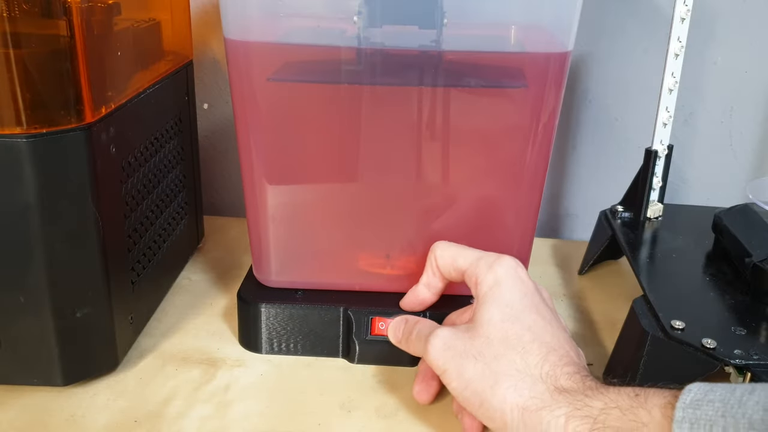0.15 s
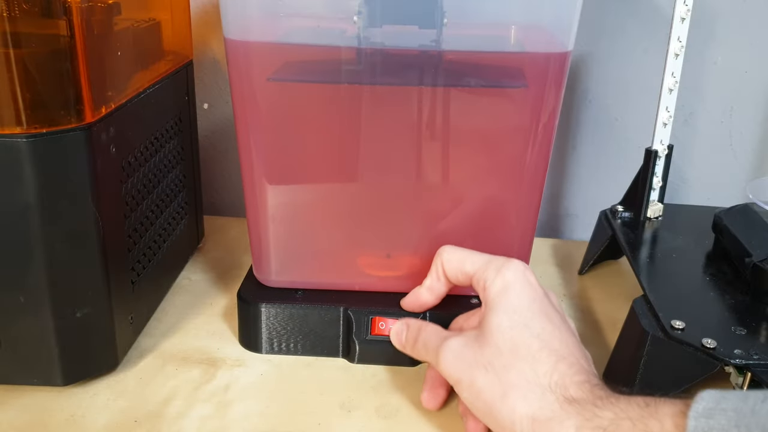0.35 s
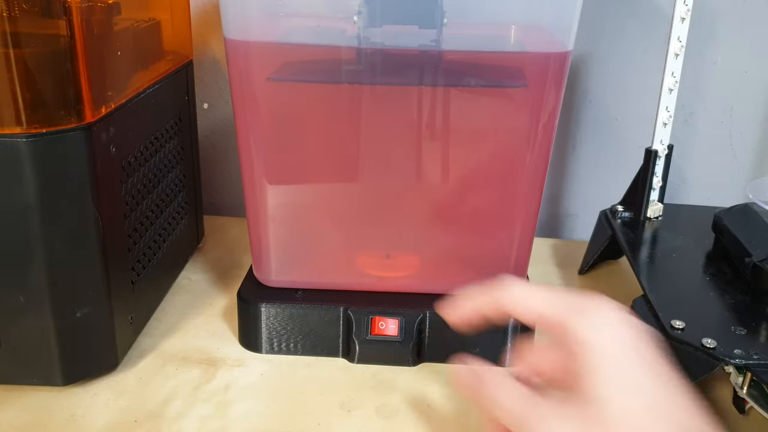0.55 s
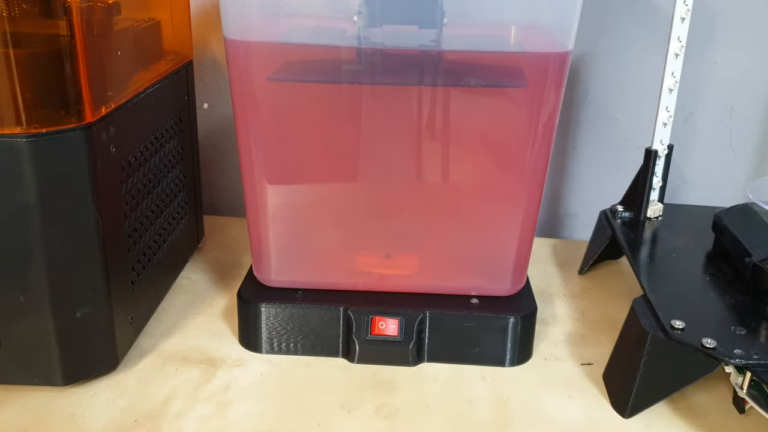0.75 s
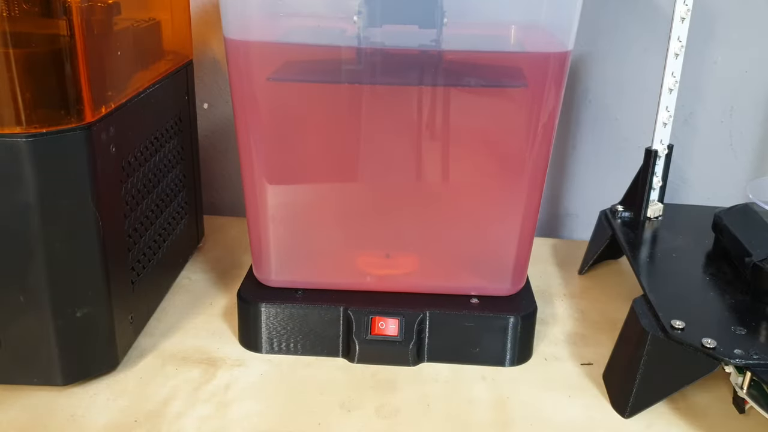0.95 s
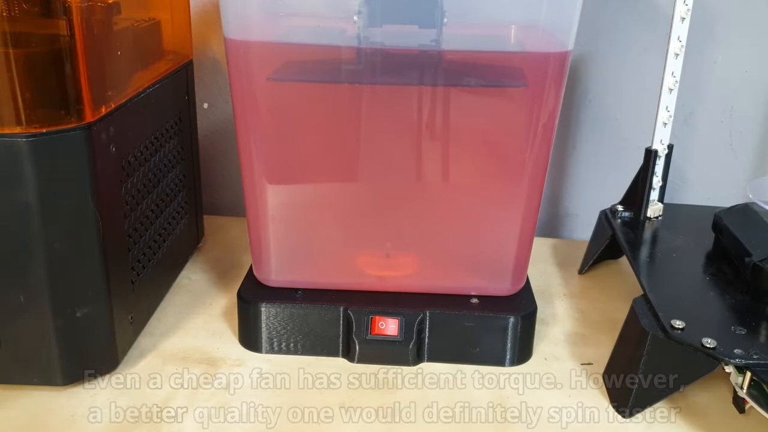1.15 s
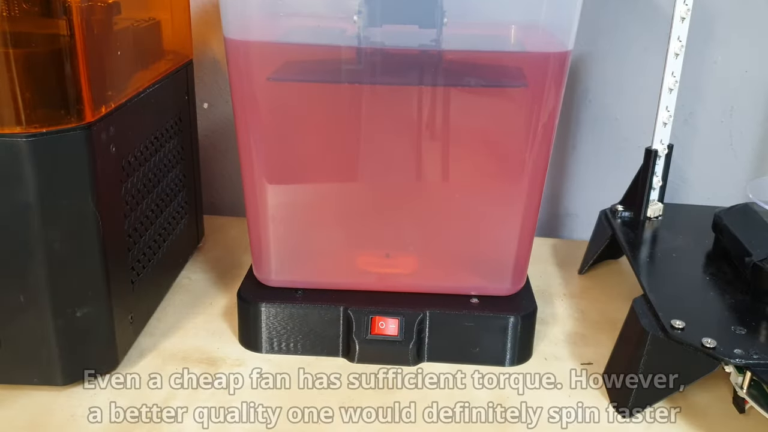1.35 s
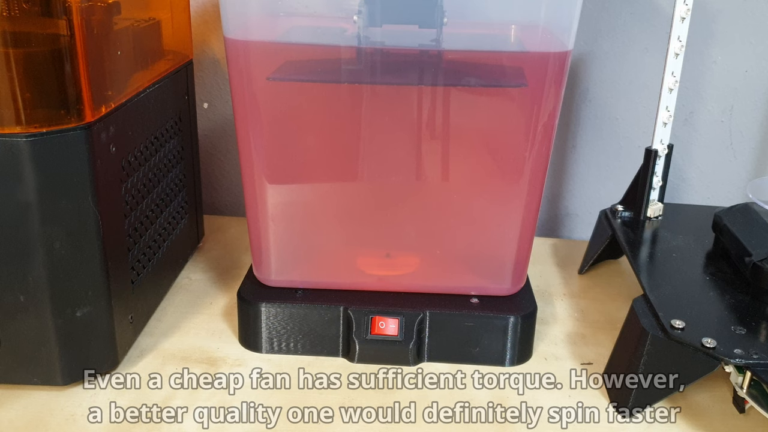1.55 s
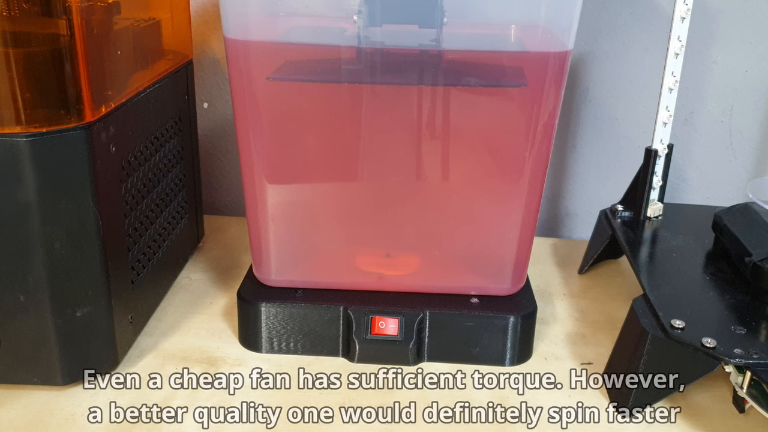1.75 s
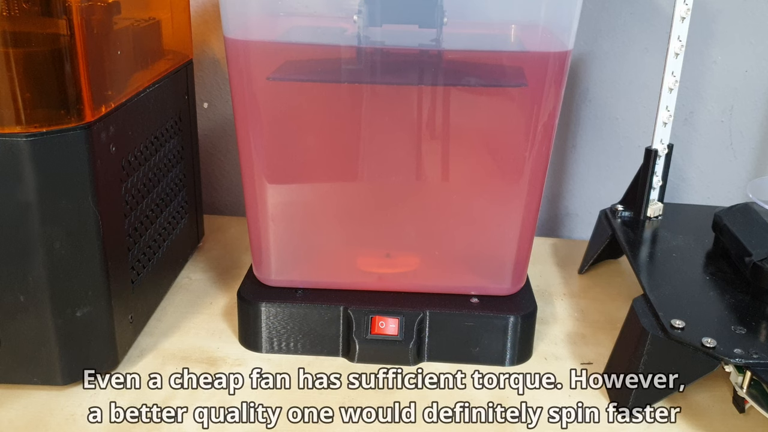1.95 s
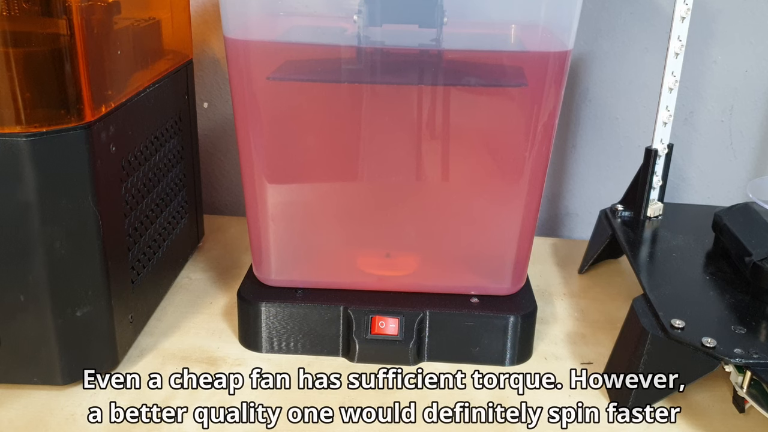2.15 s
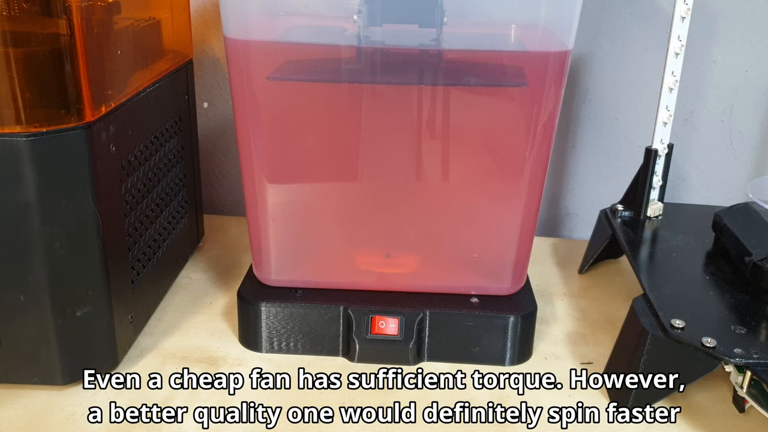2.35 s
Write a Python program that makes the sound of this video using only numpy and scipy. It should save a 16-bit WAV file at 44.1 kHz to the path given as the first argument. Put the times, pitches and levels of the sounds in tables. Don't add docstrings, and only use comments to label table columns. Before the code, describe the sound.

A plastic rocker switch snaps on at about 0.2 s: a sharp, bright, hollow crack with a quick rebound rattle, bench thump and short room tail. Before it, only faint room air. From about 0.3 s a stirrer spins up, reaching a steady muffled rumble by 0.8 s, rubbing and knocking unevenly about seven turns a second until 2.4 s. A sleeve rustles faintly near 0.5 s; low hum and hiss lie underneath.

```python
import sys
import numpy as np
from scipy import signal
from scipy.fft import rfft, irfft, next_fast_len
from scipy.io import wavfile
from scipy.ndimage import map_coordinates

SR = 44100
rng = np.random.default_rng(int(sys.argv[2]) if len(sys.argv) > 2 else 0)


def amplitude_ratio(level_db):
    exponent = np.asarray(level_db, float) / 20
    return 10 ** exponent


def master(y):
    cut = np.clip(np.atleast_2d(y).T, -1, 1)
    pcm = np.round(cut * 32767)
    wavfile.write(sys.argv[1], SR, pcm.astype(np.int16))


N = 105840

# hz, level_db_per_hz
AIR_SPECTRUM = [(18, -30), (30, -1.5), (93, -4.5), (188, -25.5), (285, -9.5), (714, -28.5), (1980, -16.5),
                (7350, -34.5), (15700, -25)]
# time_s, level_db
AIR_LEVEL = [(0, -71), (.2, -78), (.7, -76), (1.4, -79), (2.4, -78.5)]
# hz, level_db_per_hz
HISS_SPECTRUM = [(1470, -31), (2500, -4), (3050, -13.5), (4810, -2.5), (5230, -2.5), (6900, 0.5),
                 (8170, -9), (12100, 0.5), (15700, -7.5)]
# time_s, level_db
SLEEVE_LEVEL = [(.21, -95.5), (.4, -74), (.53, -63), (.58, -71.5), (.65, -73), (.75, -75), (.9, -81),
                (1.0, -75), (1.15, -80), (1.35, -88), (1.6, -105)]
# hz, level_db_per_hz
CLOTH_SPECTRUM = [(2500, -23), (5000, -11), (6600, 0.5), (7600, -6), (8400, -16), (11000, -6),
                  (15700, -6.5)]
# centre_s, half_length_s, centre_hz, width_hz, level_db
THIN_HISS = (-2, 3.62, 14001.5, 1501, -83.5)
# time_s, level_db
HUM_LEVEL = [(0, -82), (.6, -99), (.95, -91), (1.7, -82.5), (2.4, -87.5)]
# hz, t60_s
ROOM_T60 = [(150, .3), (500, .35), (1200, .42), (2300, .44), (3200, .52), (6000, .44), (9000, .33),
            (15000, .29)]
# hz, gain_db
ROOM_COLOUR = [(150, 1), (600, -0.5), (1500, 0), (3200, 2), (4500, -1.5), (8500, 1.5), (11000, -1.5),
               (15000, -1)]
# time_s, level_db
RUB_LEVEL = [(.25, -91.5), (.4, -66), (.5, -71.5), (.62, -66.5), (.8, -62), (.95, -63.5), (1.2, -62.5),
             (1.7, -62.5), (2.4, -64.5)]
# place_turns, width_turns, force_db
ROUGH_SPOTS = [(-.44, .05, -5.5), (-.29, .05, -3), (-.13, .06, -3.5), (.01, 0.046, -2.5), (.12, .055, -8.5),
               (.27, .07, -13)]
# time_s, peak_db
BAR_BUMPS = [(0.57, -55), (0.61, -53.5), (0.697, -55.5), (0.774, -53), (0.88, -51), (0.919, -48.5),
             (1.011, -53), (1.057, -52), (1.137, -52.5), (1.171, -51), (1.299, -52), (1.354, -52.5),
             (1.448, -52.5), (1.499, -52.5), (1.575, -55), (1.643, -48.5), (1.789, -51), (1.932, -49),
             (2.02, -52), (2.076, -48.5), (2.167, -53), (2.214, -50), (2.326, -55), (2.365, -49)]
# centre_hz, width_hz, gain_db
TUB_MODES = [(150.7, 40, -6), (323.4, 60, -1), (376, 60, -1.5), (457.9, 44, -2), (560, 81.15, -5.5),
             (733, 92.8, -4.5), (888, 120, -7.5), (1020, 110, -6), (1194, 120, -6.5), (1620, 390, -19)]
# hz, left_over_right_db
TUB_PAN = [(200, -3.5), (380, -5), (700, -3), (1300, 0.5)]
# time_s, level_db
CONTACTS = [
    (0.2109, -60),
    (.2144, -36.5),
    (0.2158, -10),
    (0.2159, -9),
    (0.2199, -15),
    (0.222, -21),
    (.2290, -21),
]
# hz, level_db_per_hz
CRACK_SPECTRUM = [(90, -55.5), (300, -33), (750, -24.5), (1100, -18.5), (2000, -15.5), (3100, -10),
                  (8300, -13), (15700, -4.5)]
# centre_hz, width_hz, over_crack_db
SHELL_MODES = [(1235, 230, 8), (3250, 450, 3), (6000, 1100, 8.5), (12700, 2800, 2.5)]
# hz, left_over_right_db
SNAP_PAN = [(150, -6), (1200, -2), (2500, -1), (5500, -7), (8500, -3.5), (12500, 0)]
# hz, level_db, t60_s
BENCH_MODES = [(45, -62, .15), (132.44, -55, .2), (198, -49.5, .2), (259, -47, .17), (333.8, -49, .14),
               (440, -51.5, .18), (600, -53.5, .15), (836, -49.5, 0.12), (1203, -34, .07),
               (1265, -36.5, .06)]
# hz, gain_db
BAND_LIMIT = [(15650, 0), (15900, -22), (16400, -55), (16480, -120)]

TURN_S, MARK_S = 0.1446, 0.7750
SPIN_UP_S, START_S = 0.14, 0.25
SPOT_SCATTER_DB, DRAG_DB, RUB_DB, BUMP_GAIN_DB = -1.35, -11.5, -6.5, 81
KNOCKS_PER_S, KNOCK_SCATTER_DB = 240, 1.5
TUB_TOP_HZ, TUB_LOW_HZ = 1390, 204
TUB_WET_DB, TUB_LAG_S, TUB_DECAY_SHARE = -3.5, 0.00007, 0.2
SNAP_T60_S, SNAP_ALIKE, SNAP_ROOM_DB = 0.025, 0.18, 11
THUMP_S, THUMP_RISE_S, THUMP_FLUTTER_DB = 0.2153, 0.004, 5.5
SIDES = np.array([[0.5], [-0.5]])


def unit(x):
    return x / np.sqrt(np.mean(x ** 2) + 1e-20)


def along(points, hz):
    f, v = np.transpose(points)
    return np.interp(np.log(hz + 1), np.log(f + 1), v)


def curve(rows):
    return np.interp(np.arange(N) / SR, *np.transpose(rows))


def wobble(rate_hz):
    knots = rng.standard_normal(int(N * rate_hz / SR) + 4)
    return map_coordinates(knots, [np.arange(N) * rate_hz / SR])


def filtered(x, response):
    m = next_fast_len(N + SR // 2)
    return irfft(rfft(x, m) * response(np.fft.rfftfreq(m, 1 / SR)), m)[..., :N]


def modes(table, f):
    total = 0
    for k, (centre_hz, width_hz, db) in enumerate(table):
        damping = 1j * f * width_hz
        total = total + (-1) ** k * amplitude_ratio(db) * damping / (centre_hz ** 2 - f ** 2 + damping)
    return total


def pair(alike):
    a, b = rng.standard_normal((2, N))
    angle = np.arccos(np.clip(alike, 0, 1)) / 2
    shared, own = np.cos(angle) * a, np.sin(angle) * b
    return np.array([shared + own, shared - own])


def shaped_noise(alike, spectrum):
    return unit(filtered(pair(alike), lambda f: amplitude_ratio(along(spectrum, f))))


def room(x, decay_share=1.0):
    hz, t, z = signal.stft(rng.standard_normal((2, SR)), SR, nperseg=256)
    t60_s = decay_share * along(ROOM_T60, hz)[:, None]
    gain = amplitude_ratio(along(ROOM_COLOUR, hz)[:, None] - 60 * t / t60_s)
    tail = signal.istft(z * gain, SR, nperseg=256)[1]
    delayed = np.pad(x, (250, 0))[None]
    return signal.fftconvolve(delayed, tail / np.linalg.norm(tail[0]), axes=1)[:, :N]


def air_and_hiss():
    air = amplitude_ratio(curve(AIR_LEVEL) + 0.27 * wobble(4.9)) * shaped_noise(0.15, AIR_SPECTRUM)
    hiss = amplitude_ratio(-84) * shaped_noise(0.0082, HISS_SPECTRUM)
    centre_s, half_s, hz, width_hz, db = THIN_HISS
    thin = unit(filtered(pair(0.05), lambda f: modes([(hz, width_hz, 0)], f)))
    swell = np.exp(-0.5 * ((np.arange(N) / SR - centre_s) / half_s) ** 2)
    return air + hiss + amplitude_ratio(db) * swell * thin


def sleeve():
    return amplitude_ratio(curve(SLEEVE_LEVEL) + 1.9 * wobble(38)) * shaped_noise(0.27, CLOTH_SPECTRUM)


def hum():
    low = filtered(pair(0.8), lambda f: modes([(46, 18, 0)], f) ** 2)
    return amplitude_ratio(curve(HUM_LEVEL) + [[-1.2], [1.2]]) * unit(low)


def contact_force():
    t = np.arange(N) / SR
    spin_lag_s = SPIN_UP_S * np.exp(-np.clip(t - START_S, 0, 9) / SPIN_UP_S)
    turns = (t - MARK_S + spin_lag_s) / TURN_S
    luck = rng.standard_normal((len(ROUGH_SPOTS), 24))
    force = amplitude_ratio(DRAG_DB)
    for (place, width, db), row in zip(ROUGH_SPOTS, luck):
        lap = np.round(turns - place)
        peak = amplitude_ratio(db + SPOT_SCATTER_DB * row[lap.astype(int) + 6])
        force = force + peak * np.exp(-0.5 * ((turns - place - lap) / width) ** 2)
    return force


def stirrer():
    struck = rng.random(N) < KNOCKS_PER_S / SR
    strength = amplitude_ratio(KNOCK_SCATTER_DB * np.clip(rng.standard_normal(N), -2, 2))
    knocks = struck * strength * np.sign(rng.random(N) - 0.4)
    drive = contact_force() * (unit(knocks) + amplitude_ratio(RUB_DB) * rng.standard_normal(N))
    for time_s, db in BAR_BUMPS:
        drive[round(time_s * SR)] += amplitude_ratio(db + BUMP_GAIN_DB)

    def tub(f):
        low_cut = (1j * f / (TUB_LOW_HZ + 1j * f)) ** 2
        return modes(TUB_MODES, f) / (1 + 1j * f / TUB_TOP_HZ) ** 2 * low_cut

    sound = unit(filtered(drive, tub))
    direct = filtered(sound, lambda f: np.exp(-2j * np.pi * f * TUB_LAG_S * SIDES))
    both = direct + amplitude_ratio(TUB_WET_DB) * room(sound, TUB_DECAY_SHARE)
    panned = filtered(both, lambda f: amplitude_ratio(along(TUB_PAN, f) * SIDES))
    return amplitude_ratio(curve(RUB_LEVEL)) * unit(panned)


def bench_thump():
    u = np.clip(np.arange(N) / SR - THUMP_S, 0, 9)
    thump = 0
    for hz, db, t60_s in BENCH_MODES:
        level = amplitude_ratio(db - 60 * u / t60_s + THUMP_FLUTTER_DB * wobble(45))
        thump = thump + level * np.sin(2 * np.pi * hz * u + SIDES / 2)
    return thump * (1 - np.exp(-u / THUMP_RISE_S))


def switch():
    t = np.arange(N) / SR
    burst = 0
    for time_s, db in CONTACTS:
        burst = burst + amplitude_ratio(db - 60 * np.clip(t - time_s, 0, 1) / SNAP_T60_S) * (t >= time_s)

    def shell(f):
        return amplitude_ratio(along(CRACK_SPECTRUM, f)) * (1 + abs(modes(SHELL_MODES, f)))

    snap = filtered(burst * pair(SNAP_ALIKE), shell)
    click = filtered(signal.unit_impulse(N, round(THUMP_S * SR)), shell)
    both = snap + amplitude_ratio(SNAP_ROOM_DB) * room(click) + bench_thump()
    return filtered(both, lambda f: amplitude_ratio(along(SNAP_PAN, f) * SIDES))


def scene():
    return air_and_hiss() + sleeve() + hum() + stirrer() + switch()


def roll_off(x):
    return signal.sosfilt(signal.butter(12, 16470, fs=SR, output="sos"), x)


def record(dry):
    mix = filtered(dry, lambda f: amplitude_ratio(along(BAND_LIMIT, f)))
    return roll_off(mix)


dry = scene()
out = record(dry)
master(out)
```